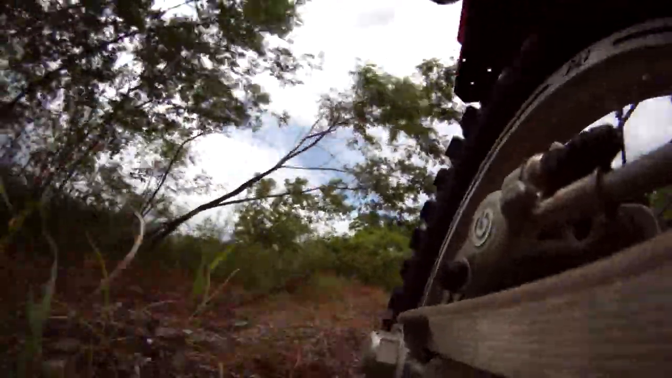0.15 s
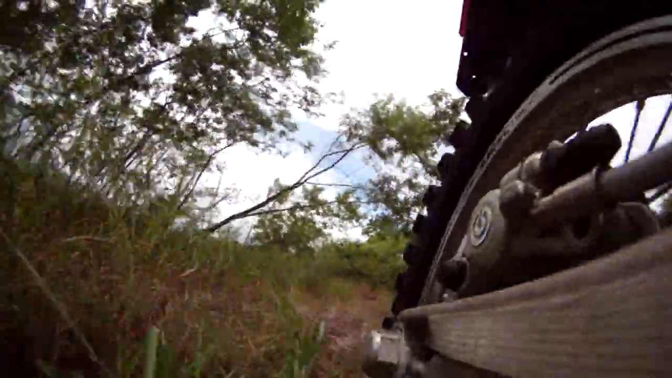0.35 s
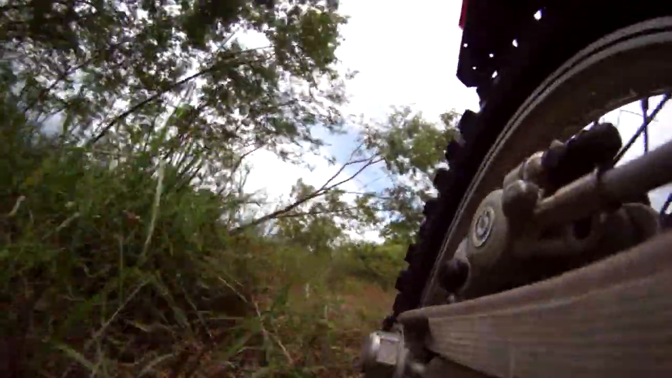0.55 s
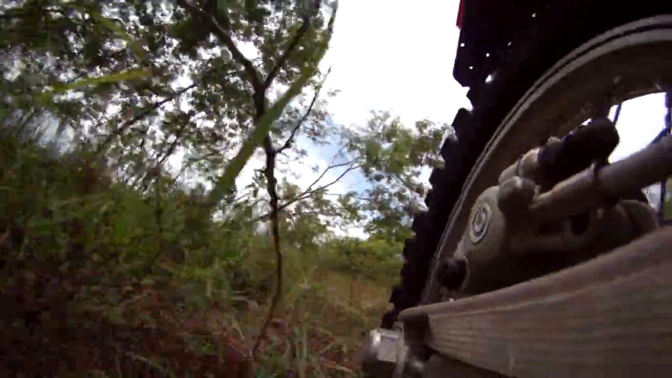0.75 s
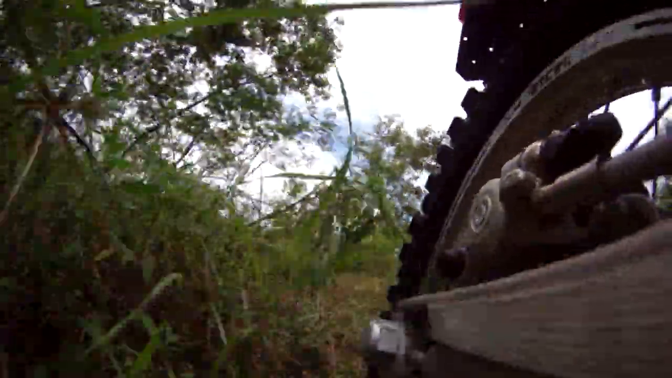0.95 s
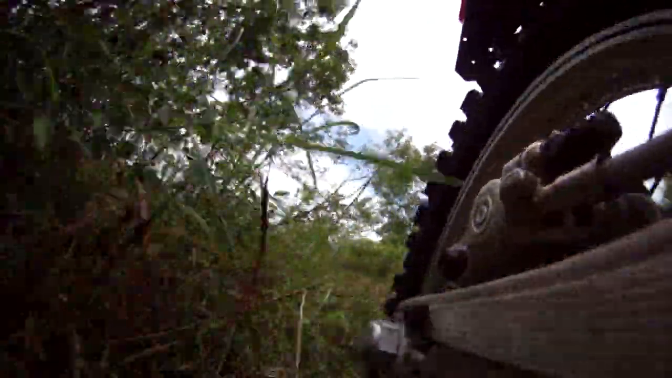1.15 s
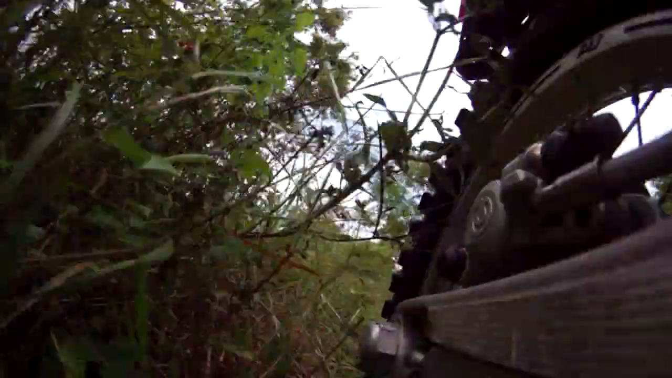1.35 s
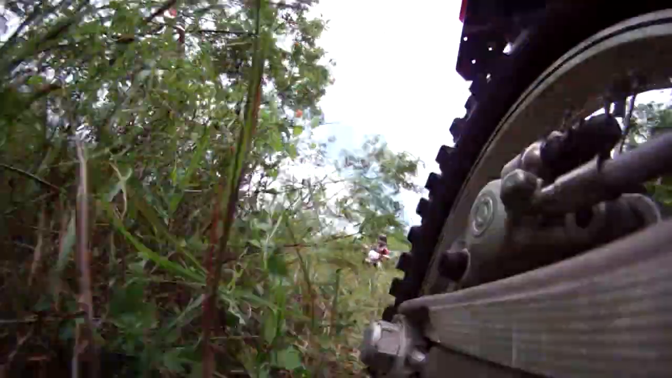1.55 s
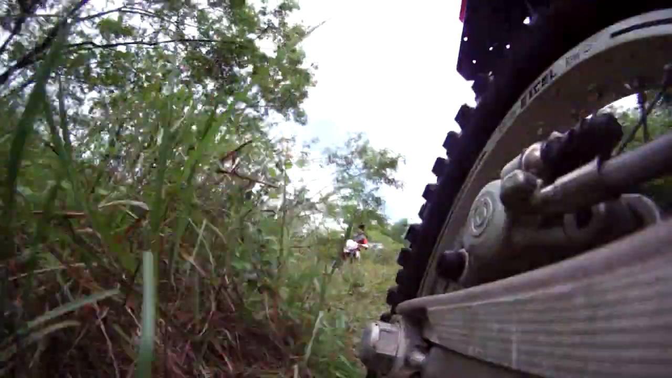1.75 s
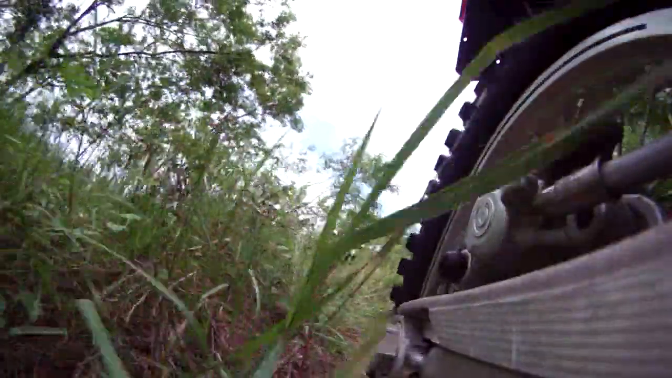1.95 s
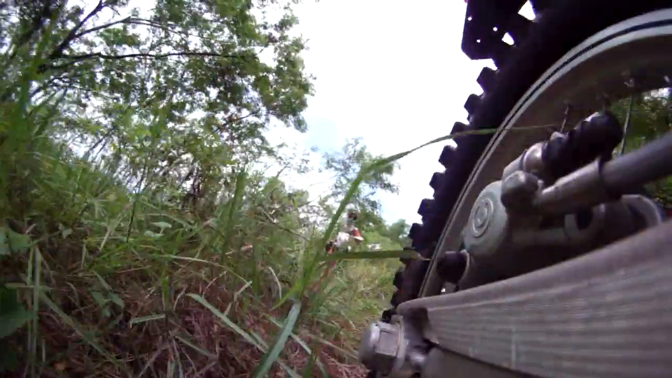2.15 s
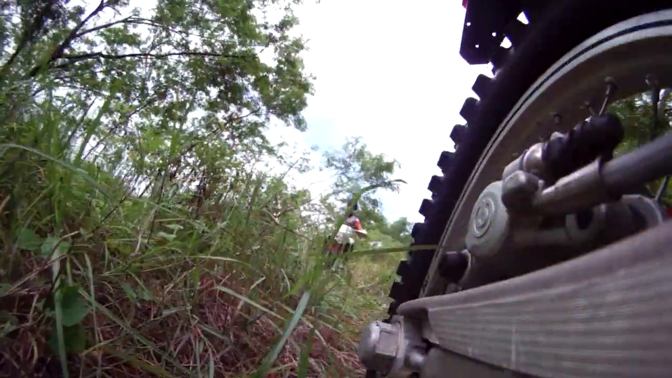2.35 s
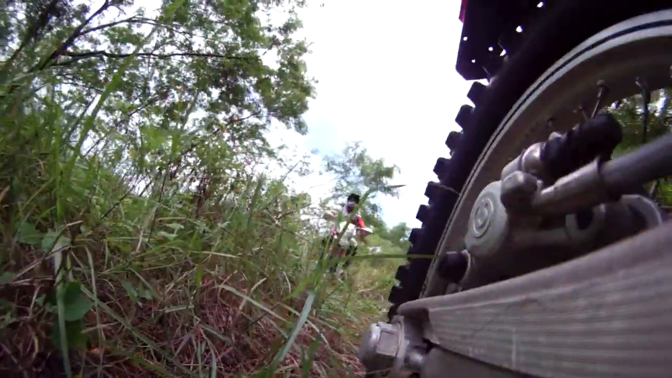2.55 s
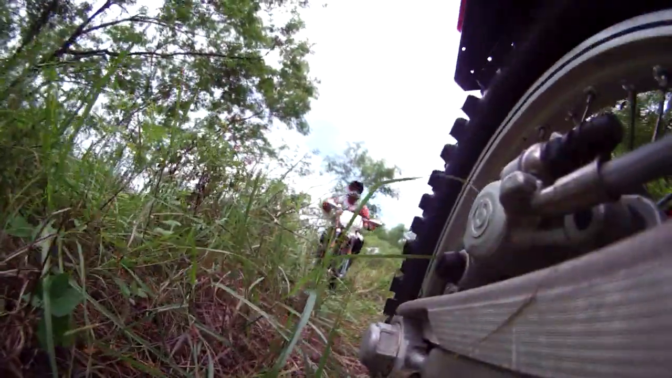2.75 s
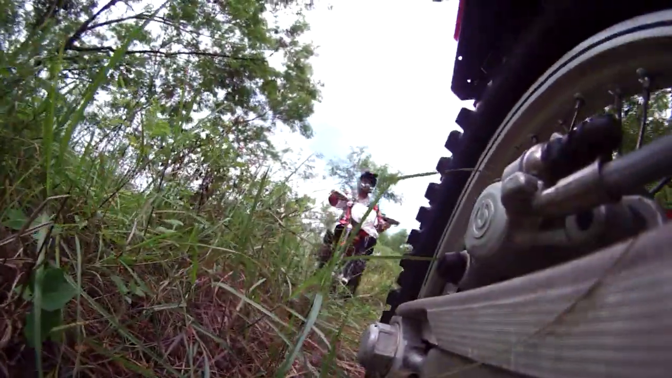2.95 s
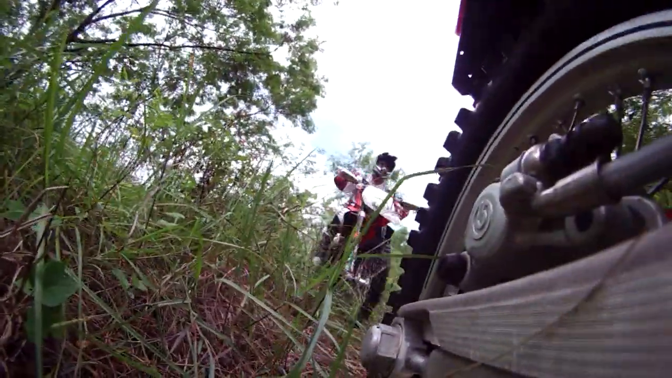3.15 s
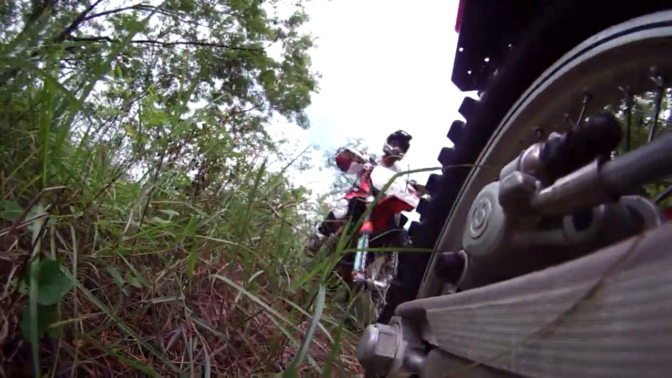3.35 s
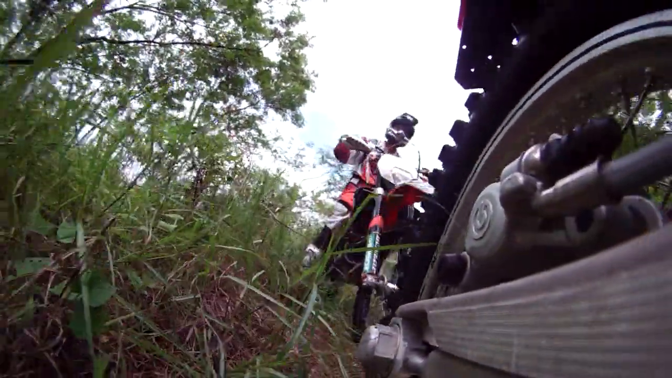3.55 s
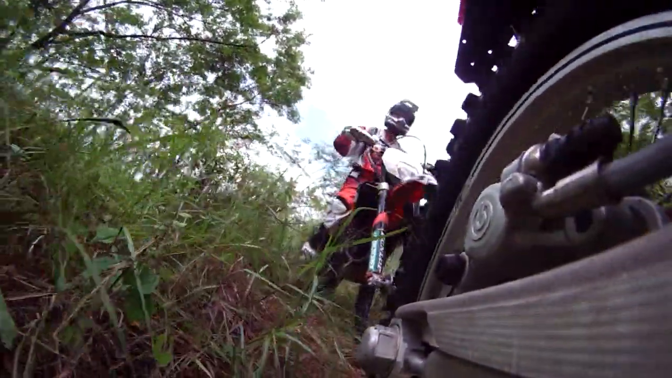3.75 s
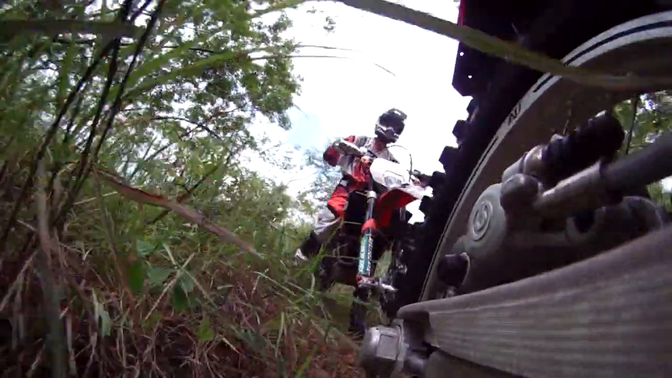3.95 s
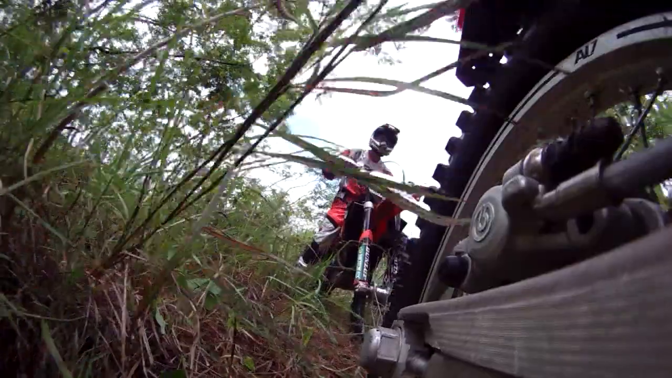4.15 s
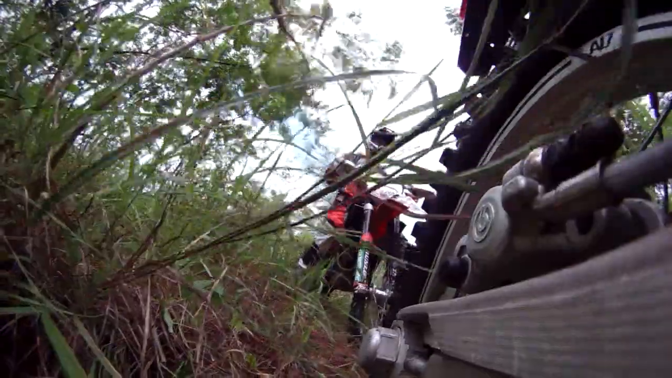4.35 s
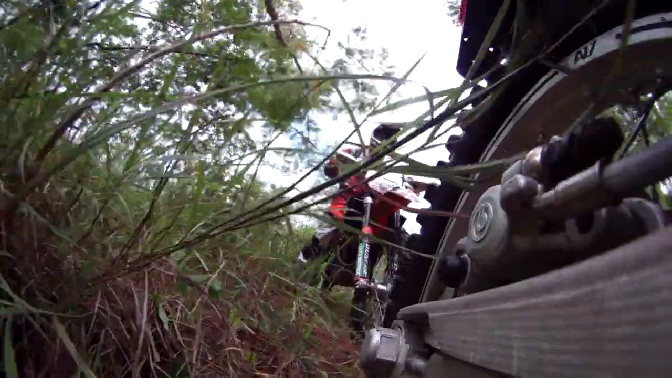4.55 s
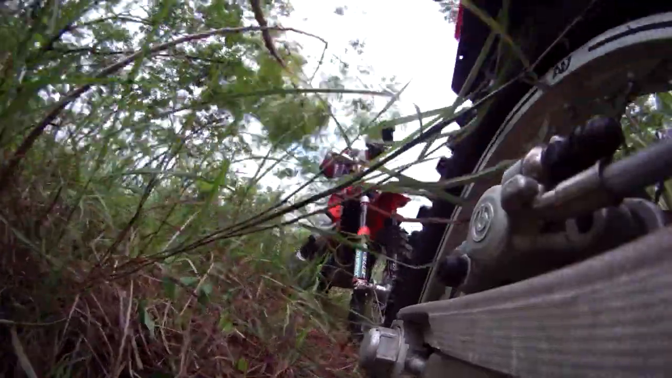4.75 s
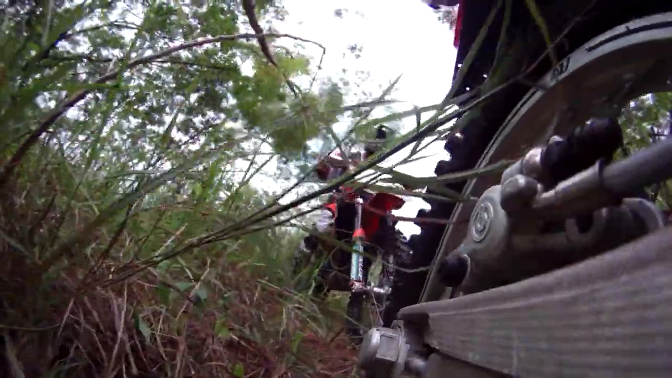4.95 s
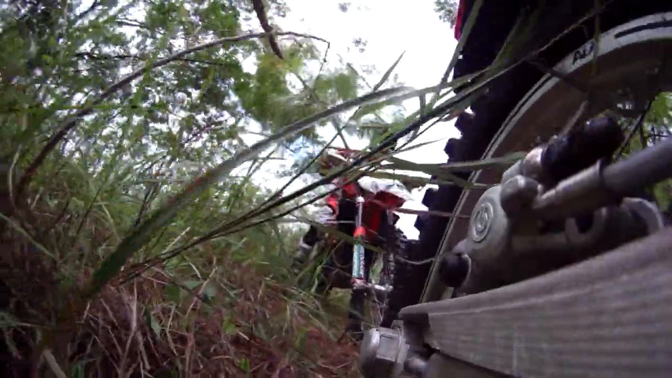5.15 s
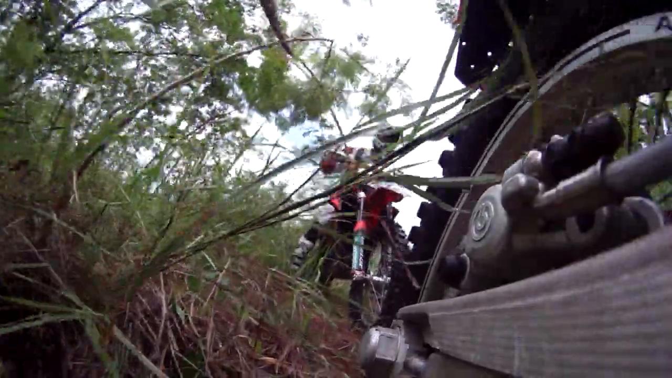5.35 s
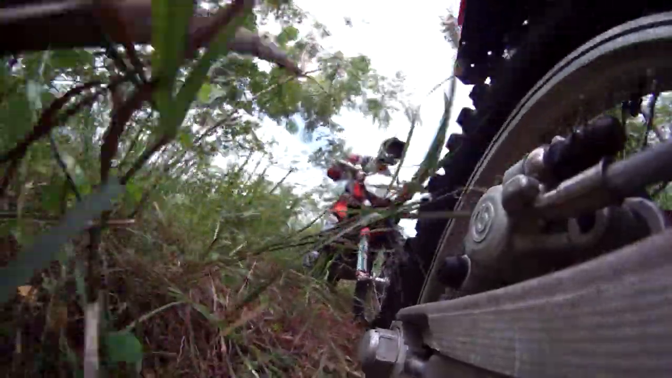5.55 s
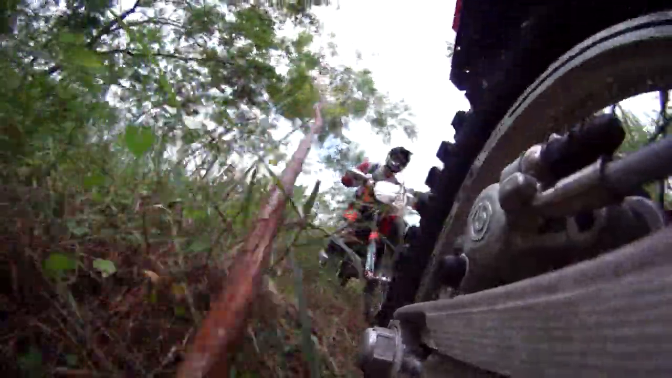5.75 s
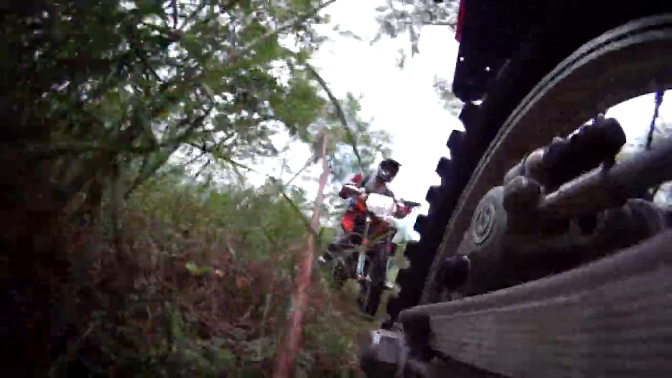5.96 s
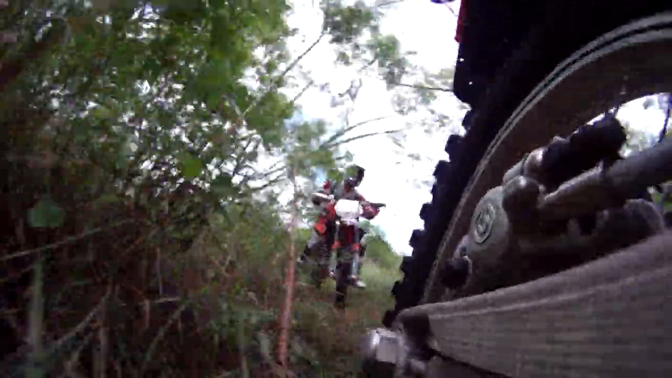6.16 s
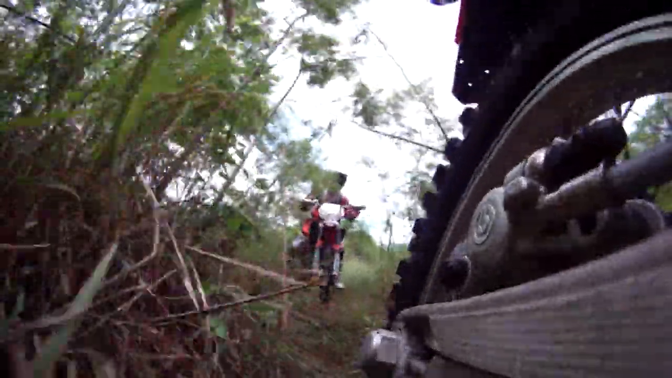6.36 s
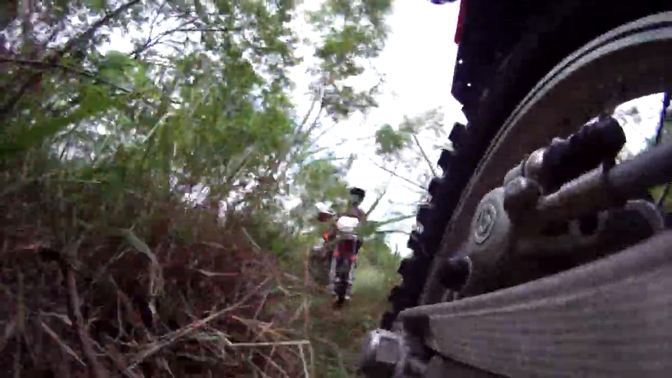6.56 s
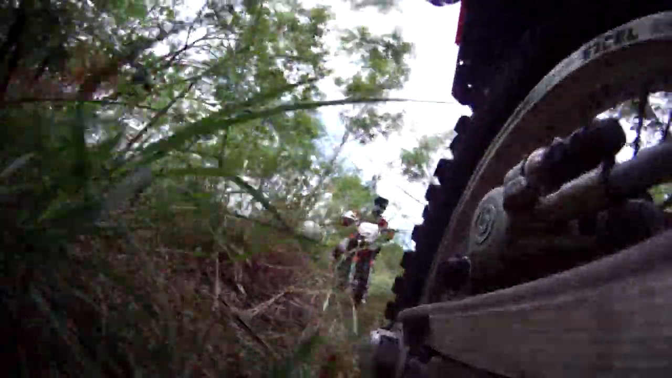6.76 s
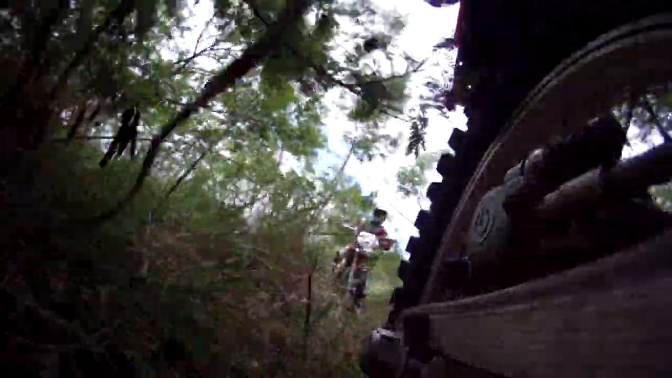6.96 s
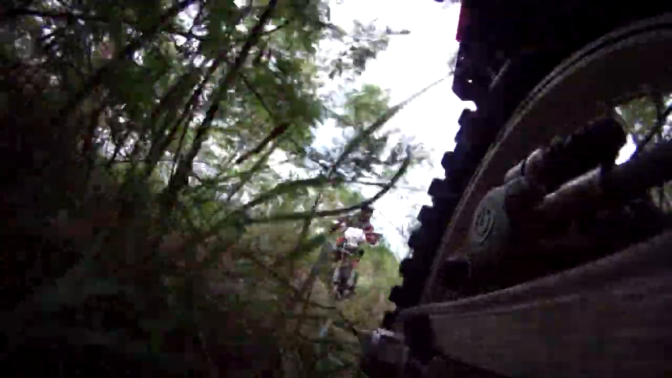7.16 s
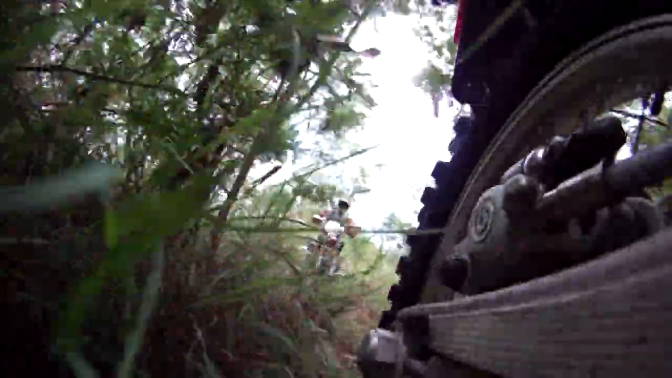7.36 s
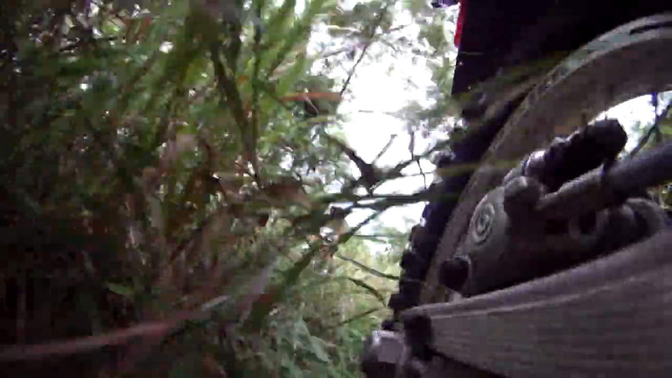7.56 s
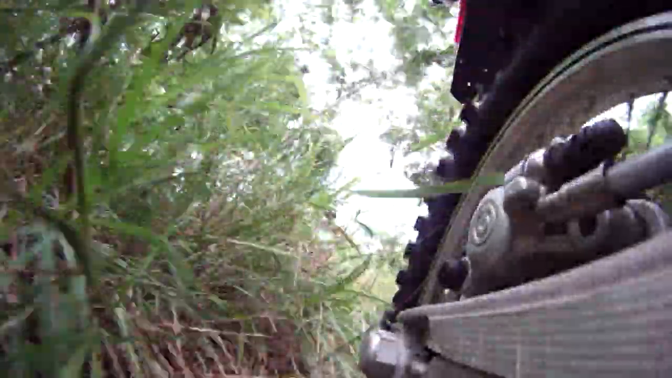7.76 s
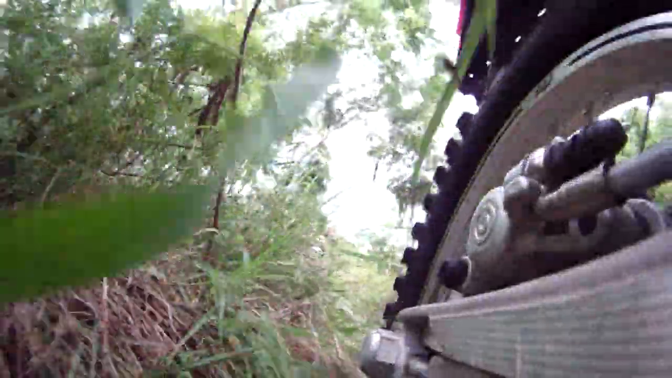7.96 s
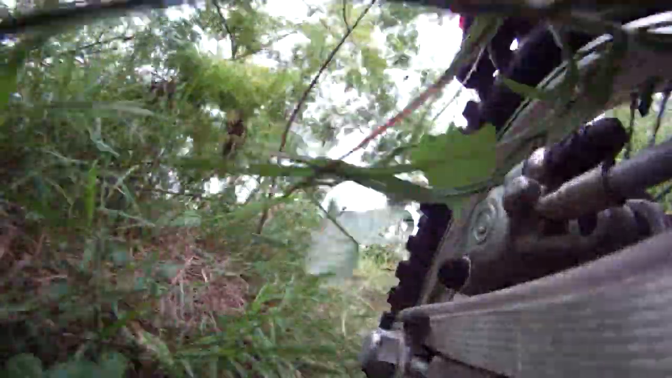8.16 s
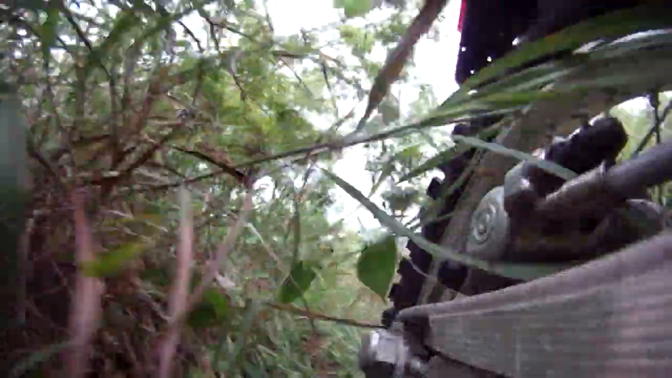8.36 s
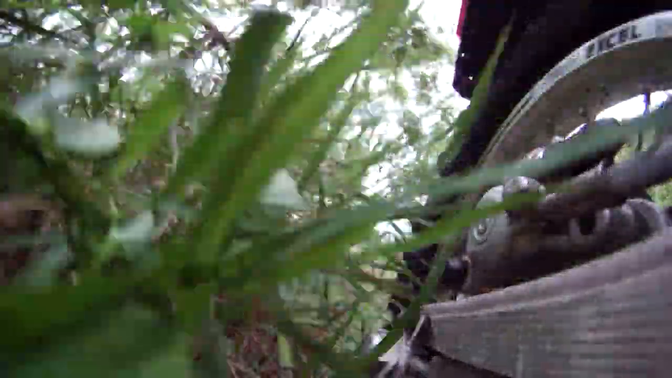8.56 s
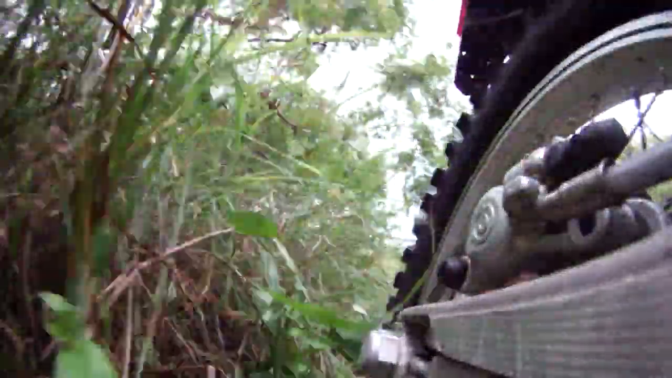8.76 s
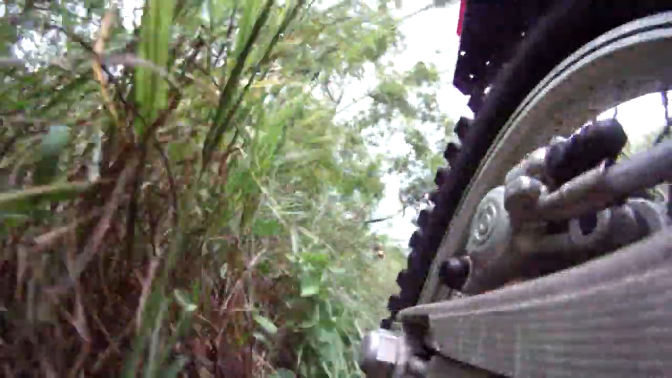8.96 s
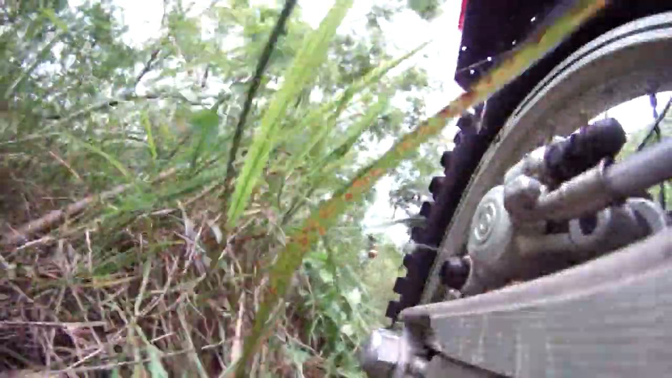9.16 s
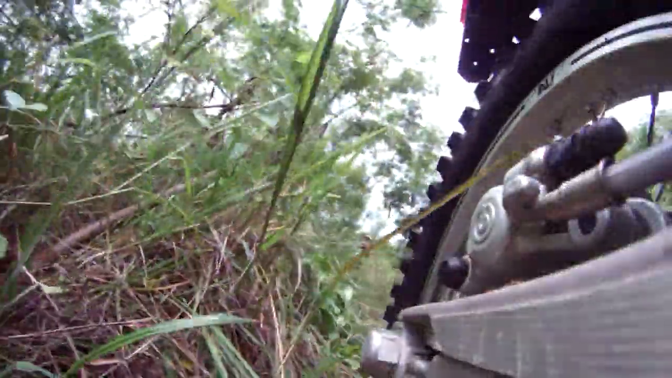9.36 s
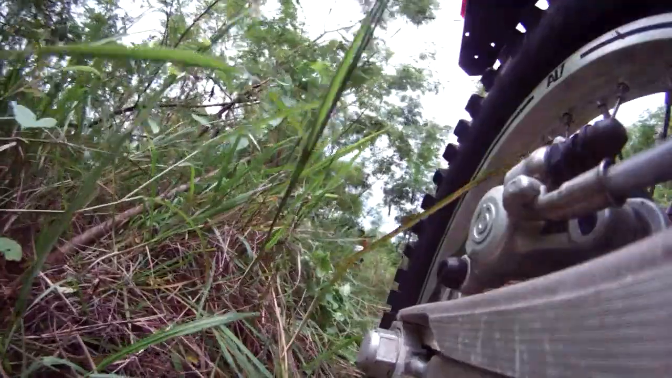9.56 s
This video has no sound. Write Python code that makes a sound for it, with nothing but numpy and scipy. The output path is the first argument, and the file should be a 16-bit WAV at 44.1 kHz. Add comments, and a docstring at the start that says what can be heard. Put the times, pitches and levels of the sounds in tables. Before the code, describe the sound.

From a cased microphone mounted low on a dirt bike creeping along an overgrown trail, the engine sinks to a putting idle while stems scrape and twigs crack loudly against the case. Three growling swells of throttle follow, with a low shaking rumble. More brush rustles and strikes as the revs fall to idle. Near the end the chain slaps several times and another bike thuds faintly behind.

```python
"""A four-stroke single dirt bike drops to idle with a jolt and a chain slap, heard close up from a
cased camera low by the rear wheel. Creeping along an overgrown trail, it is opened up three times and
falls back: the crank shakes the mount, the exhaust thuds, the valves clatter. Grass and stems scrape
the case, and twigs whip it hard enough to overload the microphone. A second bike follows behind."""
import sys
import numpy as np
from scipy import signal
from scipy.fft import rfft, irfft
from scipy.io import wavfile
from scipy.ndimage import uniform_filter1d, map_coordinates

SR = 44100
rng = np.random.default_rng(int(sys.argv[2]) if len(sys.argv) > 2 else 0)


def unload_wav(signal):
    """Save mono or channel-first audio to the path in sys.argv[1] as 16-bit WAV at rate SR, clipped to [-1, 1]."""
    wavfile.write(
        sys.argv[1],
        SR,
        np.round(np.clip(np.atleast_2d(signal).T, -1, 1) * 32767).astype(np.int16),
    )


N = 424241
T = np.arange(N) / SR
IDLE_HZ, IDLE_DB = 32, -20  # crank speed and combustion strength at idle


def undb(db):
    """Decibels to gain."""
    return 10 ** (np.asarray(db) / 20)


def unit(x):
    """Scale to rms 1."""
    return x / np.sqrt(np.mean(x ** 2))


def curves(table):
    """The columns of a timed table, one value a sample."""
    s, *columns = np.transpose(table)
    return [np.interp(T, s, c) for c in columns]


def swell(s, half_s):
    """A smooth rise to 1 at time s and back."""
    return np.exp(-((T - s) / half_s) ** 2)


def walk(per_s):
    """A smooth random drift through per_s values a second; spread near 1."""
    return map_coordinates(rng.standard_normal(1024), [T * per_s], order=3, mode="wrap")


def add(track, s, sound):
    """Mix a sound in at time s."""
    start = max(int(s * SR), 0)
    track[start:start + len(sound)] += sound[:max(N - start, 0)]


def resonate(x, hz, q):
    """One resonance of sharpness q."""
    return signal.lfilter(*signal.iirpeak(hz, q, fs=SR), x)


def passband(x, kind, hz, order):
    """Keep the lows, the highs or a band."""
    return signal.sosfilt(signal.butter(order, hz, kind, fs=SR, output="sos"), x)


def strokes(cycle, share, scatter_db, jitter_s):
    """One impulse a cycle at the given share of it, uneven in size and time; mean power near 1."""
    at = np.flatnonzero(np.diff(np.floor(cycle - share)) > 0)
    size, timing = rng.standard_normal((len(at), 2)).T
    late = (jitter_s * SR * timing).astype(int)
    pulses = np.zeros(N)
    pulses[np.clip(at + late, 0, N - 1)] = undb(scatter_db * size) * np.sqrt(np.gradient(at))
    return pulses


def burst(pulses, t60):
    """Each impulse becomes a dying puff of noise of the same energy."""
    keep = undb(-120 / (t60 * SR))
    power = signal.lfilter([1 - keep], [1, -keep], pulses ** 2 + 1e-12)
    return np.sqrt(power) * rng.standard_normal(N)


def ring(pulses, t60):
    """Every impulse sets off the same dense set of dying modes."""
    t = T[:SR // 10]
    modes = rng.standard_normal(len(t)) * undb(-60 * t / t60)
    return signal.fftconvolve(pulses, modes / np.linalg.norm(modes))[:N]


# Resonances of the case around the microphone: (frequency [Hz], width [Hz], gain [dB])
CASE_MODES = [(425.5, 61, 4.5), (635, 146, 5), (850, 27, 2.5), (1086, 74, 8), (1226, 98, -3),
              (1554, 514, 5), (2100, 58, 0.5), (2315, 310, 1), (3110, 240, 4), (3896, 644, -8.5),
              (4580, 120, 1), (4940, 850, 3.5)]
def through_case(x, tone, size=16384):
    """Colour a source with its own tone and the case's resonances; white noise keeps its power."""
    f = np.arange(size // 2 + 1) * SR / size
    hz, db = np.transpose(tone)
    db = np.interp(np.log(f + 1), np.log(hz), db)
    for centre, width, gain_db in CASE_MODES:
        db = db + gain_db * np.exp(-2 * ((f - centre) / width) ** 2)
    # folding the cepstrum makes the filter causal
    cepstrum = irfft(np.log(undb(db)))
    cepstrum[1:size // 2] *= 2
    cepstrum[size // 2 + 1:] = 0
    response = irfft(np.exp(rfft(cepstrum)))
    return signal.fftconvolve(x, response / np.linalg.norm(response))[:N]


# Shake at the camera mount: (crank speed [Hz], first order [dB], second order [dB])
MOUNT_SHAKE = [(34.5, -19.5, -26.5), (44.6, -14, -22), (60.4, -13, -24), (79.5, -10.5, -31),
               (87.3, -10.5, -21)]
# Its brief swells and dips: (time [s], half length [s], first order [dB], second order [dB])
SHAKE_SWAYS = [(2.1, 0.53, -0.5, 7.5), (3.947, 0.13, -0.5, 1), (5.863, .04, -5, 2), (6.803, 0.047, -2, 1),
               (4.276, 0.032, -8, -5), (3.472, 0.11, 2.5, 0.5), (4.396, 0.057, 2.5, -9),
               (4.707, 0.13, -8.5, -6), (7.043, 0.056, 4, 3.5), (7.275, 0.027, -26, -14),
               (7.43, 0.073, 5, -5), (8.148, 0.3, -1.5, -3.5)]
def shake(cycle, hz, throttle_db):
    """The piston rocks the mount once, twice and thrice a turn; firings kick it; the wheel rumbles."""
    speeds, first, second = np.transpose(MOUNT_SHAKE)
    first_db = np.interp(hz, speeds, first) + 3.1 * walk(per_s=20)
    first_db += sum(db * swell(s, half_s) for s, half_s, db, _ in SHAKE_SWAYS)
    second_db = np.interp(hz, speeds, second)
    second_db += sum(db * swell(s, half_s) for s, half_s, _, db in SHAKE_SWAYS)
    angle = 4 * np.pi * cycle
    piston = undb(first_db) * np.cos(angle) - undb(second_db) * np.cos(2 * angle)
    piston += undb(-31) * np.cos(3 * angle)
    kick_db = throttle_db - 4 + np.interp(hz / 2, speeds, first) + 2.2 * walk(per_s=20)
    rumble = unit(passband(rng.standard_normal(N), "band", [18, 70], order=2))
    return piston + undb(kick_db) * np.cos(angle / 2) + undb(-30) * rumble


# The silencer, heard close by from below: (frequency [Hz], level [dB])
EXHAUST_TONE = [(25, -51), (48, 6), (80, 11.5), (100, 0.5), (120, -5.5), (145, -3.5), (190, -17.5),
                (280, -4), (450, -10), (650, -27.5), (1000, -53), (3000, -85)]
def exhaust(cycle, throttle_db):
    """A thud leaves the silencer at every firing, stronger under throttle, and booms on in the pipe."""
    puffs = strokes(cycle, share=.3333, scatter_db=3.1, jitter_s=.0001)
    boom = resonate(puffs, 142, q=4) - resonate(puffs, 92, q=3)
    return through_case(.16 * puffs + .76 * boom, EXHAUST_TONE) * (undb(-23) + undb(throttle_db - 33))


# Gas flow and frame buzz at the rear wheel: (frequency [Hz], level [dB])
RASP_TONE = [(70, -18.5), (140, 10), (185, 20), (265, 12.5), (320, 4), (410, 2.5), (500, -1), (600, 7),
             (760, -12), (900, -7.5), (1100, -10), (1450, -2.5), (2000, -1.5), (2600, -18.5), (3200, -14.5),
             (3900, -19.5), (4700, -18), (6300, -35), (8000, -39), (10000, -55), (15000, -67.5)]
def rasp(cycle, throttle_db, split_hz=292.5):
    """Gas rushes out and in once a cycle: a low push, a buzz of frame modes above it, a turbulent hiss."""
    outflow = strokes(cycle, share=.375, scatter_db=1.2, jitter_s=.00002)
    intake = strokes(cycle, share=.825, scatter_db=1.2, jitter_s=.00002)
    push = passband(.35 * outflow + .51 * intake, "low", split_hz, order=3)
    frame = ring(outflow, t60=.065) + .7 * ring(intake, t60=.065)
    buzz = passband(frame, "high", split_hz, order=3)
    turbulence = burst(outflow, t60=.06) + .8 * burst(intake, t60=.06)
    hiss = passband(turbulence, "high", 2000, order=2)
    return through_case(push + 1.86 * buzz + 1.7 * hiss, RASP_TONE) * undb(throttle_db - 20.5)


# Resonances of the exhaust pipe: (frequency [Hz], width [Hz], level [dB])
PIPE_MODES = [(194, 46, -3), (260.4, 55, -2.5), (363, 14, -2.5), (391.6, 32, 0.5), (564, 56, 2.5),
              (880, 50, -2.5), (946, 100, -1.5), (1453, 51, 2), (1667, 140, -7), (3230, 150, -11.5)]
# The pipe's tone at the microphone: (frequency [Hz], level [dB])
GROWL_TONE = [(100, 3), (600, 0.5), (2000, 1), (5000, -22.5)]
def growl(cycle, throttle_db):
    """The blow-down pulse and, about a turn later, the intake gulp ring the pipe, louder under load."""
    blows = strokes(cycle, share=.2, scatter_db=.8, jitter_s=.00003)
    gulps = strokes(cycle, share=.66, scatter_db=1, jitter_s=.00004)
    pulses = blows + .5 * gulps + .55 * ring(blows, t60=.05) + .08 * burst(blows, t60=.05)
    # neighbouring modes swing in opposite senses at the outlet
    pipe = sum((-1) ** k * undb(db) * resonate(pulses, hz, q=hz / width)
               for k, (hz, width, db) in enumerate(PIPE_MODES))
    return unit(through_case(pipe, GROWL_TONE)) * undb(throttle_db - 18.5)


# The putt at close range: (frequency [Hz], level [dB])
PUTT_TONE = [(120, -7), (300, -1.5), (480, -3.5), (650, -0.5), (850, -4), (1100, -1.5), (1700, -5.5),
             (2400, -17.5), (4700, -36), (8000, -60.5), (15000, -59.5)]
def putt(cycle, throttle_db):
    """The exhaust valve opens with a short, dry putt that grows only a little with throttle."""
    opens = strokes(cycle, share=.175, scatter_db=1.1, jitter_s=.0001)
    pop = .4 * opens + .8 * ring(opens, t60=.05) + .35 * burst(opens, t60=.06)
    return through_case(pop, PUTT_TONE) * undb(-30.5 + .28 * (throttle_db - IDLE_DB))


# Piston slap and valve taps: (place in the two-turn cycle [0-1], level [dB])
METAL_CONTACTS = [(.25, -4), (.37, -6), (.5, -11), (.65, -4.5), (.74, -6), (.82, -5), (.94, -5)]
# The engine cases, ahead of the microphone: (frequency [Hz], level [dB])
CLATTER_TONE = [(80, -8.5), (200, 2.5), (330, -7), (480, 1), (700, -2.5), (1000, -6), (1700, -11.5),
                (2500, -26.5), (4700, -28.5), (6500, -45), (9000, -61), (15000, -60.5)]
def clatter(cycle, hz):
    """Piston and valves tap the cases, each with its own ring, over the whirr of chain and gears."""
    metal = undb(-33) * rng.standard_normal(N)
    for share, db in METAL_CONTACTS:
        taps = strokes(cycle, share, scatter_db=1.8, jitter_s=.00015)
        knock = .1 * taps + .68 * ring(taps, t60=.042) + .66 * burst(taps, t60=.042)
        metal += undb(db - 30.5) * knock
    return through_case(metal, CLATTER_TONE) * (hz / IDLE_HZ) ** .47


def hollow_knock(cycle, hz, note_hz=657, q=4.7):
    """Once a turn the piston knocks a hollow note from the engine, which stands out at idle."""
    knocks = strokes(2 * cycle, share=.42, scatter_db=2, jitter_s=.0011)
    note = resonate(.6 * knocks + burst(knocks, t60=.06), note_hz, q)
    return unit(resonate(note, note_hz, q)) * undb(-32 - 2.5 * np.log2(hz / IDLE_HZ))


# Valve chatter, faint at the rear wheel: (frequency [Hz], level [dB])
VALVE_TONE = [(500, -23.5), (1500, -0.5), (3000, 3.5), (3900, -5.5), (4700, 3), (6000, -13), (8000, -30),
              (15000, -47.5)]
def valves(cycle):
    """The valves drop on their seats and chatter, differently every time."""
    seats = strokes(cycle, share=.73, scatter_db=2, jitter_s=.0008)
    return through_case(burst(seats, t60=.15), VALVE_TONE) * undb(-53.5)


# Combustion, heard from behind the engine: (frequency [Hz], level [dB])
CRACK_TONE = [(200, -13.5), (800, -19), (1300, 4), (1750, -4), (2300, -12), (3000, -8.5), (4700, -34),
              (7000, -27), (10000, -40.5), (15000, -63)]
# Hard firing as the throttle snaps open: (time [s], half length [s], level [dB])
THROTTLE_SNAPS = [(3.4, 0.074, -21.5), (3.48, 0.031, -24), (3.57, 0.041, -41), (3.75, 0.042, -25.5),
                  (5.003, 0.061, -26.5), (5.19, 0.02, -36), (5.442, 0.047, -19)]
def crack(cycle, throttle_db, ping_hz=4550):
    """Each firing pops at the top of the stroke, faintly at idle, and the cylinder pings after it."""
    knocks = strokes(cycle, share=0, scatter_db=1, jitter_s=.00005)
    bark = 2.2 * resonate(knocks, 1500, q=3) + .75 * ring(knocks, t60=.016) + .35 * burst(knocks, t60=.02)
    ping = resonate(burst(knocks, t60=.096), ping_hz, q=7)
    ping = resonate(ping, ping_hz, q=3)
    snaps = sum(undb(db) * swell(s, half_s) for s, half_s, db in THROTTLE_SNAPS)
    force = undb(-63.5) + undb(throttle_db - 28.5) + snaps
    return (unit(through_case(bark, CRACK_TONE)) + undb(-17) * unit(ping)) * force


# The clutch bites: (time [s], half length [s], extra combustion [dB], chain pull [dB])
CLUTCH_BITES = [(4.096, 0.086, 2.5, -18.5), (6.123, 0.19, 1, -18.5), (7.39, 0.14, 4.5, -31)]
def swingarm(cycle, hz, slip, hum_hz=605, full_drive_hz=85.5):
    """Each turn tugs the chain and the swingarm hums beside the microphone, most as the clutch bites."""
    tugs = strokes(2 * cycle, share=.5, scatter_db=1, jitter_s=.00003)
    hum = resonate(resonate(tugs, hum_hz, q=8), hum_hz, q=8)
    drive_db = -29 + 13 * np.minimum(np.log2(hz / full_drive_hz), 0) - 19 * slip
    bites = sum(undb(db) * swell(s, half_s) for s, half_s, _, db in CLUTCH_BITES)
    return unit(hum) * np.hypot(undb(drive_db), bites)


# The second bike, farther back on the trail: (time [s], firing rate [Hz], level [dB])
BIKE_BEHIND = [(0, 20, -29.5), (9, 20, -29), (9.15, 27, -22.5), (9.27, 20, -23), (9.42, 18, -20.5),
               (9.62, 15, -25)]
def follower():
    """The bike behind closes up near the end and rolls off its throttle; only its exhaust carries."""
    hz, db = curves(BIKE_BEHIND)
    puffs = strokes(np.cumsum(hz) / SR, share=0, scatter_db=-2.5, jitter_s=.0001)
    boom = passband(through_case(puffs, EXHAUST_TONE), "band", [130, 200], order=2)
    return unit(boom) * undb(db)


# Tufts sweeping right over the case: (time [s], level [dB], swell and fade time [s])
GRASS_TUFTS = [(.45, -31, 0.081), (.92, -31.5, 0.32), (1.19, -25.5, 0.084), (1.49, -29.5, 0.088),
               (1.88, -37, 0.25), (5.619, -27, 0.32), (6.65, -40.5, 0.097), (7.33, -28.5, 1),
               (7.79, -26, 0.033), (7.96, -34, 0.025), (8.24, -31, 0.095), (8.497, -25, 0.089),
               (9.25, -34, 0.21)]
# Their rustle from inside it: (frequency [Hz], level [dB])
GRASS_TONE = [(300, -13.5), (1100, 0.5), (1700, 7), (2600, -3.5), (3700, -0.5), (4800, -10.5),
              (7000, -24.5), (10000, -36.5), (15000, -48)]
def grass(blades_per_s=650, stalks_per_s=26, stubble_db=-41):
    """Blades catch and slip on the case: dense ticks, a few much louder, and the odd stalk."""
    blades = (rng.random(N) < blades_per_s / SR) * undb(5 * np.minimum(rng.exponential(size=N), 3.6))
    stalks = (rng.random(N) < stalks_per_s / SR) * rng.random(N)
    rustle = undb(1) * unit(burst(blades, t60=.034)) + undb(-7.5) * unit(burst(stalks, t60=.049))
    tufts = [undb(db) * np.exp(-np.abs(T - s) / fade_s) for s, db, fade_s in GRASS_TUFTS]
    power = undb(stubble_db) ** 2 + sum(tuft ** 2 for tuft in tufts)
    return through_case(rustle, GRASS_TONE) * np.sqrt(power)


# Bumps in the trail, felt through the mount: (time [s], level [dB], frequency [Hz], t60 [s])
TRAIL_BUMPS = [(0.035, 0.5, 68.4, 0.095), (0.139, -8, 66, 0.18), (0.346, -12, 60, 0.079),
               (0.796, 11.5, 100, 0.04), (0.808, 5, 30.6, 0.13), (.824, 3.5, 83, 0.051),
               (.851, 9.5, 64.3, 0.072)]
def bumps():
    """A jolt sets the mount swinging for a few cycles."""
    swings, t = np.zeros(N), T[:SR // 4]
    for s, db, hz, t60 in TRAIL_BUMPS:
        add(swings, s, -undb(db - 60 * t / t60) * np.sin(2 * np.pi * hz * t))
    return swings


# Chain slaps next to the camera: (time [s], level [dB], t60 [s])
CHAIN_SLAPS = [(.037, -13, 0.042), (2.916, -10, 0.037), (2.921, -16, 0.074), (7.573, -2.5, 0.015),
               (7.58, -9.5, 0.018), (8.157, -19.5, 0.0059), (9.134, 0.5, 0.014), (9.164, -0.5, 0.036),
               (9.1903, -1.5, 0.041), (9.216, -10, .016)]
# A slap as it arrives through the mount: (frequency [Hz], level [dB])
SLAP_TONE = [(100, 2), (300, 1), (700, -11), (1100, -4), (1600, 3.5), (2200, -3.5), (3100, -9), (4000, -12),
             (4800, -15), (6500, -27), (9000, -35), (15000, -55)]
def chain_slaps(attack_s=.00083):
    """The slack chain lands on the swingarm with a dull clank."""
    blows, t = np.zeros(N), T[:SR // 6]
    for s, db, t60 in CHAIN_SLAPS:
        envelope = undb(db - 60 * t / t60) * np.minimum(t / attack_s, 1)
        add(blows, s, rng.standard_normal(len(t)) * envelope)
    return through_case(blows, SLAP_TONE)


# Twigs striking the case itself:
# (time [s], level [dB], ring [Hz], second ring [Hz], second ring gain [dB], t60 [s])
TWIG_STRIKES = [(0.124, -17, 3260, 5000, -11, .024), (.194, -18, 1730, 3300, 1, 0.036),
                (.754, 10, 1890, 3700, 6, 0.013), (.762, 4, 1700, 3070, 13, 0.037),
                (.782, 0, 1740, 3580, 5, 0.091), (.799, 5, 1365, 3630, 4, 0.03),
                (.806, -5, 2000, 3220, 10.5, 0.044), (0.814, -2.5, 1720, 3600, -7, 0.056),
                (.852, -1, 1700, 3200, -5, 0.0059), (.893, -16.5, 1900, 3600, 8, 0.029),
                (.919, -1, 1640, 3430, 6.5, 0.011), (0.931, -14, 3100, 5200, -4, .02),
                (0.942, -11.5, 1300, 2580, -10, 0.023), (1.043, -20, 2500, 3600, 0, 0.032),
                (1.1, -10, 1800, 3580, -2, .011), (1.126, 7.5, 3340, 3800, 2, 0.0041),
                (1.1315, 8.5, 3300, 3840, -9, 0.012), (1.159, -11, 1820, 3640, 2, 0.033),
                (1.168, -13, 1850, 3400, 1, .03), (1.199, 5.5, 1720, 3480, -4, 0.011),
                (1.205, 3, 1900, 3100, 9, 0.0077), (1.2109, 5.5, 1760, 3150, -6, 0.014),
                (1.217, -7, 1800, 3600, 1, 0.014), (1.235, 8.5, 2490, 1270, -6, 0.019),
                (1.264, -9, 1900, 3600, -9, 0.016), (1.286, -13, 2800, 4000, -5, .012),
                (1.301, -13, 2500, 3900, 9, 0.0094), (1.352, 5, 2960, 4700, -6, 0.0093),
                (1.366, -1.5, 1780, 3380, 8, 0.017), (1.389, -11, 1800, 3500, -4, 0.013),
                (1.398, -12.5, 1800, 3370, 3, .022), (1.428, -18, 2000, 3500, 2, .02),
                (1.458, -10.5, 1820, 3300, -3, .016), (1.505, -10.5, 1900, 5000, -6, 0.011),
                (1.528, -9, 2430, 3600, -8.5, 0.01), (1.76, -16, 4560, 3400, -4, 0.016),
                (1.858, -11.5, 3260, 5500, 7, 0.011), (2.044, -11.5, 3670, 7040, -5, .01),
                (2.11, -19, 5500, 8000, -7.5, 0.0087), (5.587, 0, 1790, 4200, -6, 0.012),
                (6.251, 2.5, 1750, 4140, 10, .012), (6.32, -11, 1590, 2400, 2.5, 0.062),
                (6.344, -11, 1700, 3480, -4, 0.036), (6.715, -4, 1530, 4270, -2, 0.017),
                (6.898, -13.5, 3400, 4260, -6, 0.041), (7.07, -13, 8000, 4000, -26, 0.051),
                (7.157, -8, 7100, 4000, -20, .016), (7.298, -14, 3230, 5000, -5, 0.038),
                (7.497, 5.5, 2270, 3420, -1, .009), (7.537, -7, 1880, 3500, 11.5, 0.013),
                (7.55, -8, 1790, 3500, 0, 0.026), (7.601, -17, 2370, 1700, 15, 0.0089),
                (7.657, -11, 3000, 4200, -4, 0.01), (7.701, -7.5, 1800, 3900, -4, 0.027),
                (7.72, -1.5, 1890, 3270, 8, .012), (7.727, -6, 1900, 3200, -4, 0.016),
                (7.741, -13, 1790, 3200, 1, 0.068), (7.774, -8, 3500, 8500, 7, .014),
                (7.79, -10.5, 1770, 3200, -8, .035), (7.848, -7.5, 2100, 3600, 9, 0.017),
                (7.862, -15, 1800, 3200, -9, 0.012), (7.886, -14.5, 1900, 3600, -1, 0.018),
                (8.45, -3, 1620, 4500, 12.5, 0.011), (8.474, 4, 1500, 2480, -1, 0.013),
                (8.485, -8, 1800, 4900, 0, .02), (8.509, -4.5, 1790, 3400, -2, 0.021),
                (8.515, -10, 1800, 5000, 2, 0.013), (8.527, -12, 1750, 3100, -7, .015),
                (8.57, 0, 1680, 2670, -1, .014), (8.577, -2, 1800, 3000, -12, 0.023),
                (8.588, 0.5, 1820, 4320, 15.5, 0.0078)]
# A strike from inside the case: (frequency [Hz], level [dB])
TWIG_TONE = [(100, 6), (600, 1.5), (1200, 0.5), (1700, 3), (2600, 1.5), (3200, -3.5), (3850, 3),
             (4800, -11), (6500, -18.5), (9000, -27.5), (13000, -50), (16000, -57)]
def twigs(skids_per_s=640, skid_db=7):
    """Each twig cracks on the case, skids and rings at two pitches; thinner ones have less body."""
    hits, t = np.zeros(N), T[:SR // 6]
    for s, db, hz, second_hz, second_db, t60 in TWIG_STRIKES:
        catches = np.interp(t * skids_per_s, np.arange(256), rng.standard_normal(256))
        skid = undb(skid_db * catches * np.minimum(t / .0036, 1))
        snap = unit(rng.standard_normal(len(t)) * skid) * undb(db - 60 * t / t60)
        first, second = (np.sqrt(SR / f / 2) * resonate(snap, f, q=7) for f in (hz, second_hz))
        body = passband(snap, "high", .27 * hz, order=1)
        add(hits, s, .59 * body + .56 * (first + undb(second_db) * second))
    return through_case(hits, TWIG_TONE)


# Stiff stems dragged across the case: (time [s], half length [s], level [dB], ring [Hz])
STEM_SCRAPES = [(1.137, .012, -20, 3470), (1.188, 0.017, -23, 3440), (1.224, .005, -14, 3120),
                (1.312, 0.0046, -21, 3480), (1.45, 0.05, -40, 3260), (5.607, 0.014, -25, 4160),
                (7.432, 0.0094, -29, 3230), (7.76, 0.034, -33, 3030), (8.221, 0.019, -39, 3700),
                (8.502, 0.022, -35, 4600), (8.493, 0.033, -33, 3000), (8.57, 0.015, -31, 4700)]
def stem_squeaks(catches_per_s=900, q=4.9):
    """A stem sticks and slips in quick, uneven catches, each ringing it at its own pitch."""
    catches = (rng.random(N) < catches_per_s / SR) * undb(4 * rng.standard_normal(N))
    rub, squeaks = burst(catches, t60=.0032), np.zeros(N)
    for s, half_s, db, hz in STEM_SCRAPES:
        broad = resonate(rub, hz, q)
        squeaks += unit(resonate(broad, hz, q) + .14 * broad) * undb(db) * swell(s, half_s)
    return squeaks


# Gears meshing ahead of the microphone: (teeth [per crank turn], level [dB])
GEAR_TEETH = [(22, -4), (24, -5), (26, 0)]
def gear_whine(cycle):
    """As the first blip shuts, meshing teeth sing, roughened by their play and falling with the revs."""
    mesh = sum(undb(db) * np.sin(2 * np.pi * (2 * teeth * cycle + .2 * walk(per_s=220)))
               for teeth, db in GEAR_TEETH)
    return mesh * undb(-24 + 2 * walk(per_s=90)) * swell(3.535, half_s=.07)


def surge(hz, throttle_move_s=.016, full_hz_per_s=290):
    """How hard the crank is speeding up, 0-1."""
    acceleration = uniform_filter1d(np.gradient(hz) * SR, int(throttle_move_s * SR))
    return np.clip(acceleration / full_hz_per_s, 0, 1)


# Revs of the bike carrying the microphone: (time [s], crank speed [Hz])
CRANK_SPEED = [(0.0, 54.2), (0.43, 36.0), (0.67, 32.8), (1.02, 31.6), (1.15, 32.8), (1.5, 32.2),
               (2.17, 32.4), (2.41, 31.0), (2.71, 32.1), (3.27, 31.2), (3.37, 47.7), (3.51, 68.9),
               (3.7, 47.4), (3.83, 71.3), (4.04, 76.5), (4.15, 69.0), (4.29, 53.4), (4.61, 36.0),
               (4.93, 28.4), (5.06, 53.7), (5.17, 74.4), (5.25, 88.5), (5.36, 87.9), (5.52, 101.1),
               (5.73, 88.8), (5.92, 74.3), (6.05, 81.2), (6.19, 68.1), (6.3, 54.5), (6.48, 47.2),
               (6.86, 43.5), (7.21, 64.3), (7.4, 58.5), (7.55, 62.2), (7.75, 48.1), (7.96, 37.9),
               (8.17, 31.6), (8.5, 31.7), (9.62, 31.1)]
def scene(lag_s=.0054):
    """The engine, firing every second turn and harder with speed and load, and the brush on the trail."""
    hz, = curves(CRANK_SPEED)
    effort = surge(hz)
    coast = swell(0, half_s=.6)  # the bike rolls in with its throttle shut
    slip = np.maximum(effort, coast)
    load_db = sum(db * swell(s, half_s) for s, half_s, db, _ in CLUTCH_BITES) - coast
    throttle_db = IDLE_DB + 11 * np.log2(hz / IDLE_HZ) + 5.5 * effort + load_db
    cycle = .24 + np.cumsum(hz) / SR / 2 + .002 * walk(per_s=12)  # two-turn cycles, slightly uneven
    late = cycle - hz * lag_s / 2  # the mount and the moving gas trail the piston
    mechanics = shake(late, hz, throttle_db) + clatter(cycle, hz) + hollow_knock(cycle, hz)
    mechanics += valves(cycle) + gear_whine(cycle) + swingarm(cycle, hz, slip)
    firing = crack(cycle, throttle_db) + putt(cycle, throttle_db) + growl(cycle, throttle_db)
    gas = exhaust(late, throttle_db) + rasp(late, throttle_db)
    trail = follower() + twigs() + stem_squeaks() + chain_slaps() + grass() + bumps()
    return (mechanics + firing + gas + trail)[None]


def record(dry, top_hz=16000):
    """The camera's microphone clips at full scale, and the top of the treble is cut."""
    return signal.sosfilt(signal.ellip(10, .2, 90, top_hz, fs=SR, output="sos"), np.clip(dry, -1, 1))


dry = scene()
out = record(dry)
unload_wav(out)
```